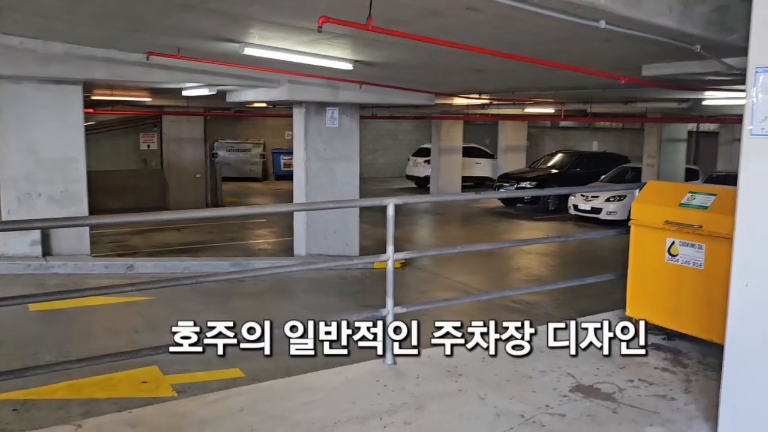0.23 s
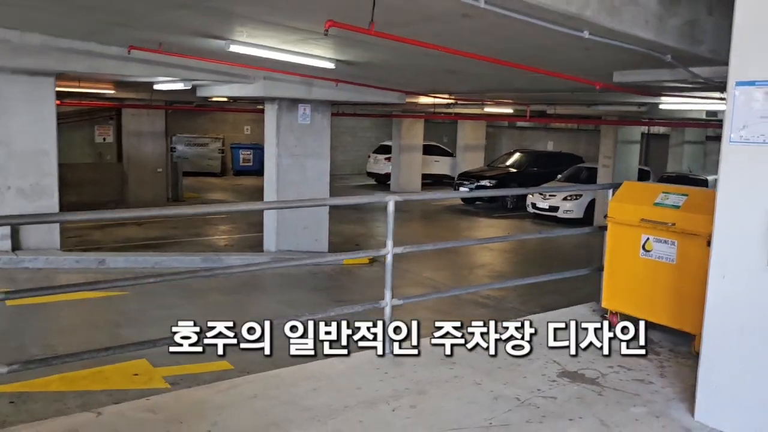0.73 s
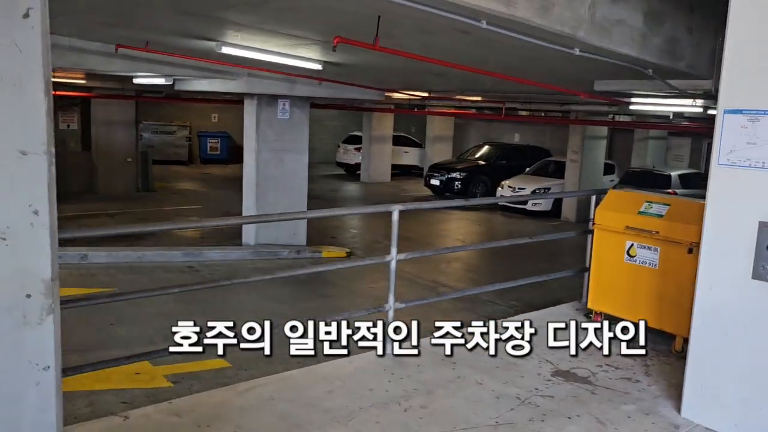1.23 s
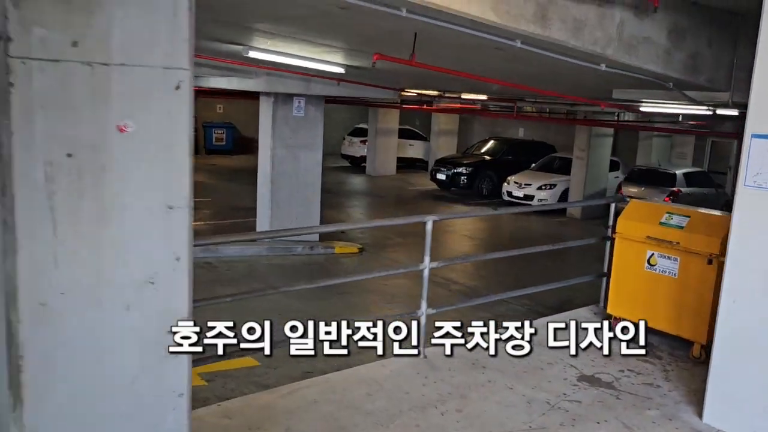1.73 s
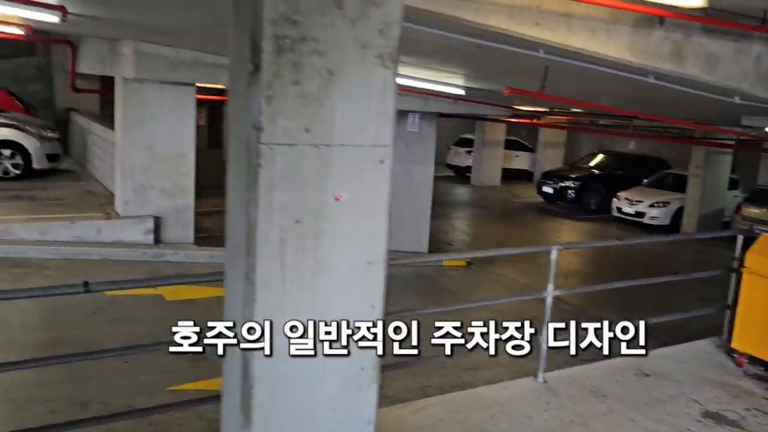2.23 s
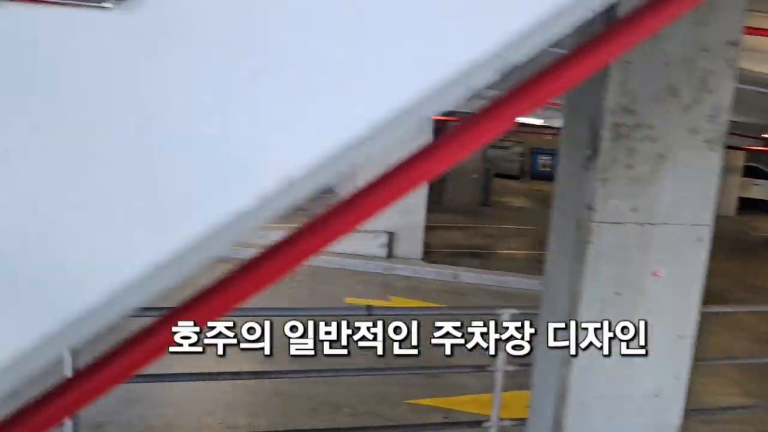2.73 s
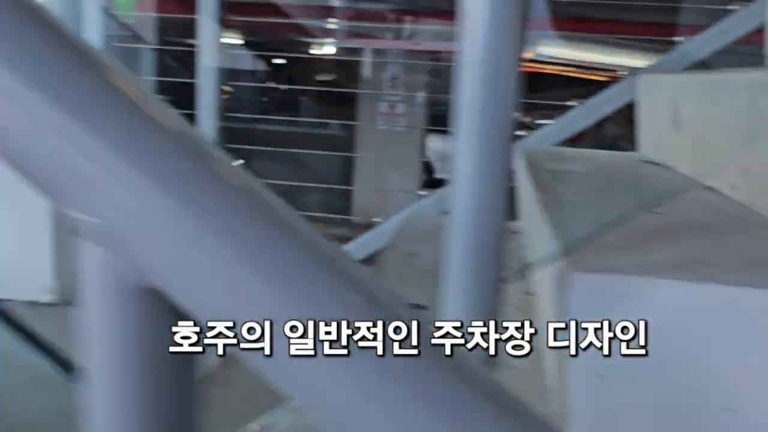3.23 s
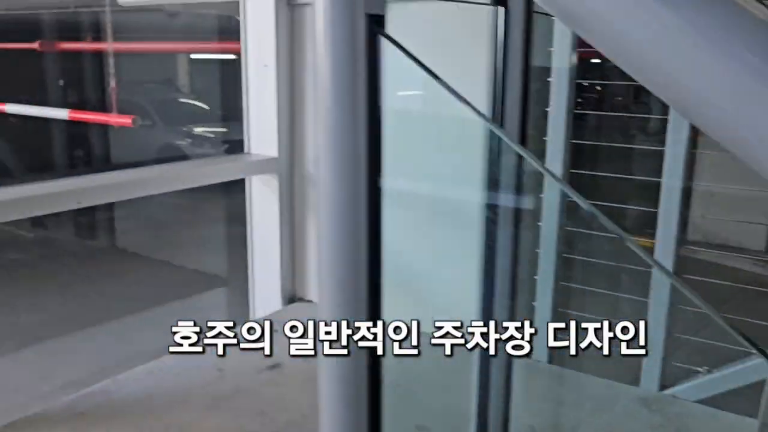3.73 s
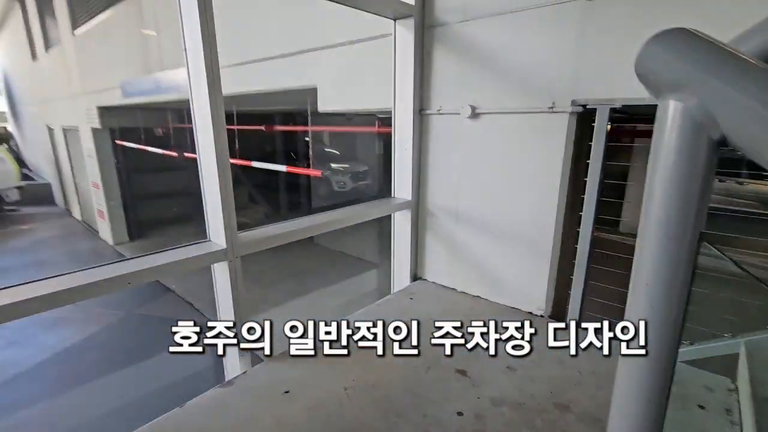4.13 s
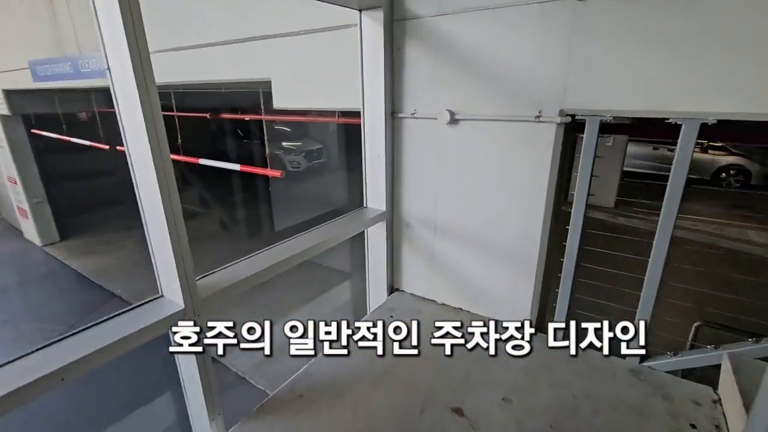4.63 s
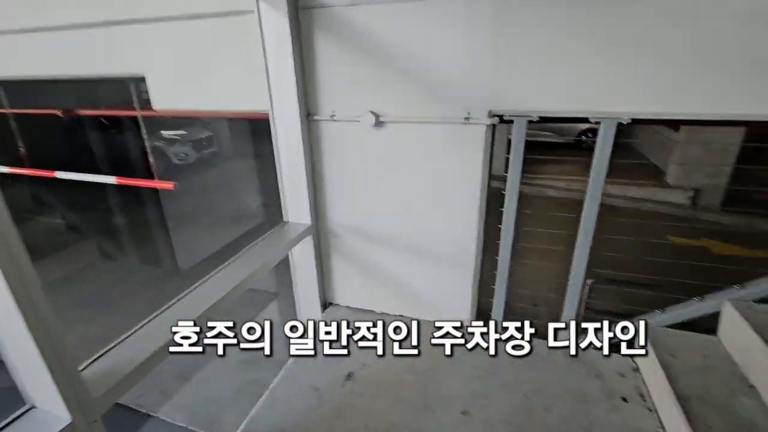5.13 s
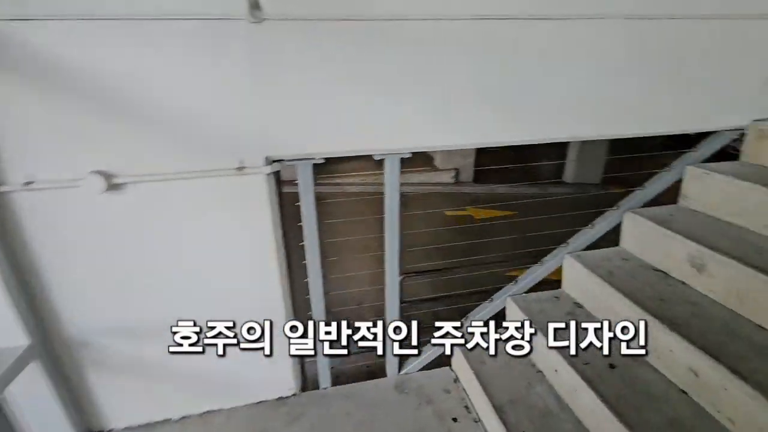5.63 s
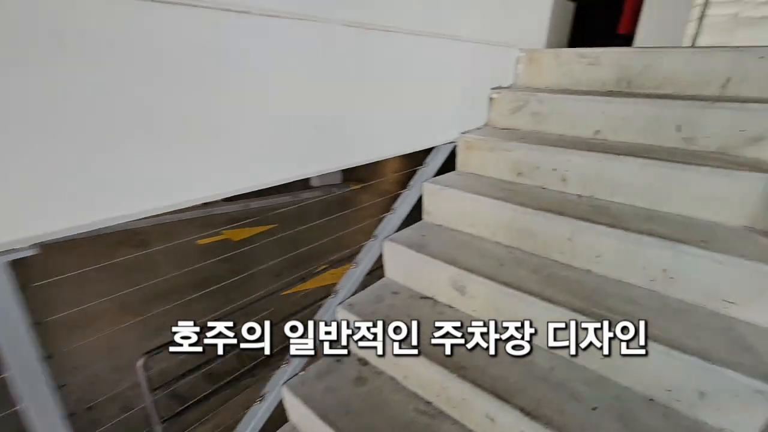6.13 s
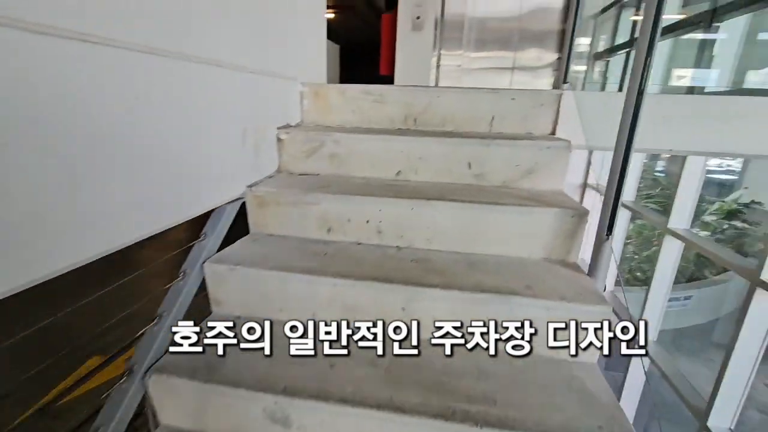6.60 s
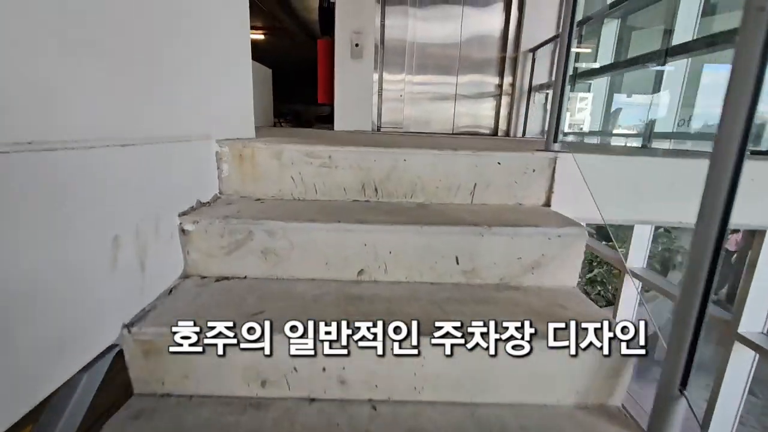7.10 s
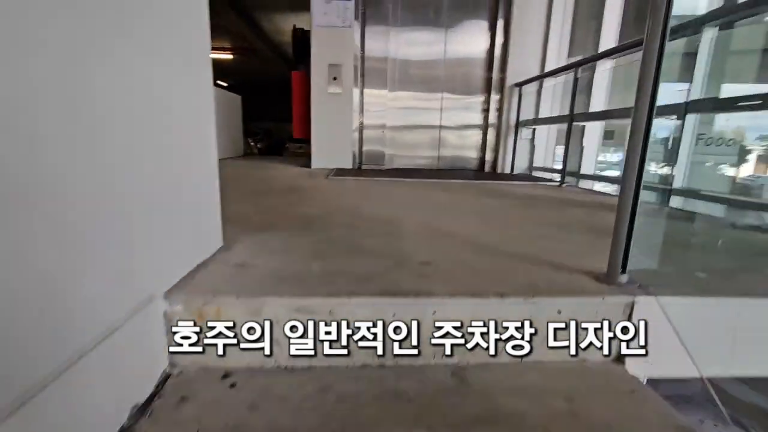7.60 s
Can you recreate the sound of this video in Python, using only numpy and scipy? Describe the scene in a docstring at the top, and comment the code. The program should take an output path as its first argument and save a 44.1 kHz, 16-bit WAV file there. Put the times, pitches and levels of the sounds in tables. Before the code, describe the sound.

One person walks evenly on gritty concrete, sharpest mid-way, with bassy wind thumps early, small dry snaps, cloth rustle and a soft fan hum.

```python
"""Footsteps in a windy car park

Someone walks through a concrete car park and up a stairwell, holding a phone.
Wind noise, slow pressure swings and pops strike the two microphone ports unequally; soles are struck
resonances and gritty slides, answered by a diffuse tail from bare walls. Clothing is crackling noise;
dry snaps, a brief squeak and a chirp are short resonant bursts; ventilation and far traffic are
coloured noise with a fan tone."""
import sys
import numpy as np
from scipy import signal
from scipy.fft import rfft, irfft, next_fast_len
from scipy.io import wavfile
from scipy.ndimage import map_coordinates

SR = 44100
rng = np.random.default_rng(int(sys.argv[2]) if len(sys.argv) > 2 else 0)


def pcm_store(signal):
    """Save signal as 16-bit PCM."""
    levels = np.round(np.clip(np.atleast_2d(signal), -1, 1) * 32767)
    wavfile.write(sys.argv[1], SR, levels.astype(np.int16).T)


N = 346626

# Wind on the ports between the thumps. Each row: time in seconds, level in dB.
WIND_LEVEL = [(0.17, -27.5), (0.35, -19), (0.43, -27), (0.6, -28), (0.88, -23), (1.1, -25.5), (1.5, -28.5),
              (1.7, -32.5), (2.15, -29.5), (2.6, -32.5), (2.75, -20.5), (3.0, -33), (3.35, -27.5),
              (3.5, -36), (4.12, -43), (4.98, -39), (5.3, -33), (5.62, -39), (6.1, -44), (6.54, -49),
              (7.16, -35), (7.43, -26), (7.86, -41.5)]
# Spectrum of the body of the wind. Each row: frequency in Hz, relative density in dB per Hz.
WIND_SPECTRUM = [(13, -53), (22, -15), (53, 4), (75, 4.5), (129, -2), (166, -10), (258, -22), (474, -28.5),
                 (522, -63), (600, -35.5), (780, -31), (1320, -120)]
# Spectrum of the sharp edge of eddies. Each row: frequency in Hz, relative density in dB per Hz.
EDGE_SPECTRUM = [(60, -47), (150, 1.5), (260, -2.5), (450, -22.5), (900, -34), (1500, -120)]
EDGE_DB = -15.5  # sharp edge of the wind, under its body

# Ventilation and traffic. Each row: time in seconds, relative level in dB, treble lift in dB.
AIR_LEVEL = [(0.17, -51, 12.5), (0.3, -51, 0), (0.55, -56.5, 8), (1.2, -56, 11), (1.8, -56, 13.5),
             (2.3, -54, 13), (2.85, -52, 9), (3.45, -51, 9.5), (3.95, -49.5, 8.5), (4.5, -50.5, 11.5),
             (5.05, -48.5, 7), (5.6, -50, 8), (6.05, -49, 6), (6.4, -45, 6), (6.73, -49, 10),
             (7.12, -51, 10), (7.45, -49.5, 6), (7.86, -49.5, 7.5)]
# Spectrum of that noise. Each row: frequency in Hz, relative density in dB per Hz.
AIR_SPECTRUM = [(24, -26), (40, 1), (109, -1), (151, -5), (275, -10), (344, -4), (476, -10), (846, -13),
                (1500, -21), (2360, -25), (3030, -30), (3990, -31), (4880, -35), (13900, -48.5),
                (15800, -48)]
# Likeness of its two sides. Each row: frequency in Hz, left-right correlation from 0 to 1.
AIR_LIKENESS = [(60, 0.23), (290, 0.93), (640, 0.75), (1400, 0), (15000, 0)]
# A fan's tone. Each row: time in seconds, relative level in dB.
FAN_LEVEL = [(3.4, -82), (3.55, -54.5), (5.1, -49), (5.6, -63), (5.92, -82), (6.1, -43.5), (7.26, -55),
             (7.86, -51.5)]
FAN_HZ = 345.6

# Steady rubbing of cloth while walking. Each row: time in seconds, relative level in dB.
SWISH_LEVEL = [(0.3, -80), (0.59, -69), (0.78, -73), (1.59, -68), (2.25, -78), (2.48, -70), (2.71, -70),
               (4.05, -72), (4.46, -80), (5.24, -60), (5.56, -65.5), (5.8, -59), (6.05, -69), (6.3, -57.5),
               (6.9, -61), (7.35, -59), (7.86, -61.5)]
# Spectrum of rubbed cloth. Each row: frequency in Hz, relative density in dB per Hz.
CLOTH_SPECTRUM = [(1500, -10), (4000, -6.5), (8000, -4), (11500, 0), (15800, -5)]

# Eddies that hit the ports full on. Each row: middle in seconds, relative level in dB, length scale in
# seconds, mean pitch in Hz, left minus right in dB.
THUMP_EVENTS = [(0.251, -15, 0.019, 90.0, 3), (0.349, -7, 0.028, 77.0, -36), (0.494, -10.5, 0.012, 85, 4),
                (0.554, -11, 0.018, 75.0, -1.5), (0.73, -18, 0.015, 81.0, 3.0),
                (0.79, -12.5, 0.037, 69.6, 1), (0.86, -12.5, 0.018, 68, -1),
                (0.889, -12.5, 0.01, 80.4, 8.0), (0.937, -15.5, 0.025, 82.6, 7),
                (1.178, -24, 0.052, 73.0, -9), (1.26, -18.0, 0.037, 69.5, -1),
                (1.329, -15, 0.017, 78.4, 0.0), (1.414, -13, 0.028, 53.0, 1),
                (1.486, -20.5, 0.03, 85.0, -9), (1.525, -26, 0.016, 74.0, -3),
                (1.594, -19, 0.015, 74.0, -19.0), (1.633, -17.0, 0.014, 84.0, 9),
                (1.817, -19.5, 0.021, 74.6, -9), (1.922, -12, 0.026, 88, -0.5),
                (2.348, -19, 0.037, 71.6, -4), (2.413, -17, 0.009, 80.0, -7),
                (2.455, -15.5, 0.0082, 73.5, 5), (2.725, -16, 0.054, 74.7, -4.0),
                (2.804, -22, 0.035, 74, -11), (3.147, -9.5, 0.03, 71.6, -2), (3.211, -14, 0.014, 83.0, 0),
                (3.308, -17.5, 0.03, 89.0, 3.5), (3.388, -15, 0.018, 78, -3.0),
                (3.652, -26.5, 0.041, 97, 1), (3.713, -22.5, 0.025, 89, -1), (5.243, -20, 0.022, 78, 1),
                (5.388, -31, 0.034, 73.0, 33.0), (5.574, -27.0, 0.059, 78, 5),
                (5.731, -31.5, 0.027, 65.4, -1.0), (5.867, -20.5, 0.025, 75.5, -2.0),
                (6.743, -25.5, 0.034, 84, -4), (6.95, -28, 0.017, 63.7, -10.0),
                (7.265, -27, 0.071, 78.0, 3), (7.322, -25, 0.013, 79, 7), (7.374, -37, 0.023, 84.0, 0.0),
                (7.416, -26.0, 0.013, 89.0, 3), (7.47, -30, 0.033, 79.0, -5),
                (7.569, -32, 0.016, 86.0, 28.0), (7.697, -18, 0.017, 90, -0.5),
                (7.818, -22, 0.02, 76, -1.0)]
# Relative scatter of pitch from port to port; rough edge in dB under the swing.
THUMP_SPREAD, THUMP_EDGE_DB = 0.095, -19

# Clothing rustles. Each row: start in seconds, relative level in dB, decay constant in seconds.
RUSTLE_EVENTS = [(0.19, -50.5, 0.11), (0.2557, -38, 0.018), (0.428, -51.5, 0.046), (0.9755, -51, 0.038),
                 (1.374, -39, 0.046), (1.492, -46.5, 0.032), (1.8193, -50, 0.028), (2, -52, 0.016),
                 (2.467, -40, 0.042), (2.5014, -51, 0.038), (2.5774, -49, 0.068), (2.951, -53, 0.1),
                 (3.151, -52, 0.033), (3.6227, -48.5, 0.052), (4.052, -47.5, 0.037), (4.4797, -50, 0.014),
                 (4.6226, -42.5, 0.059), (5.3014, -46.5, 0.015), (5.859, -46, 0.058), (6.0738, -51, 0.059),
                 (6.869, -45.5, 0.013), (7.088, -47.5, 0.032), (7.646, -46.5, 0.041), (7.799, -54, 0.051)]
RUSTLE_RISE, RUSTLE_PAN_DB = 0.11, -1  # rise over fall; left minus right

# Sole contacts. Each row: start in seconds, overall level in dB, sole ring in Hz, thud in dB, clack in dB,
# rise constant in seconds, slap's 20 dB fall in seconds, relative scuff level in dB, scuff length in
# seconds, scuff brightness in dB per octave, room in dB.
STEP_EVENTS = [(0.2, -47, 905, -1, 6.5, 0.0079, 0.023, 5, 0.15, -7, -4.5),
               (0.757, -30.5, 800, -14, -21, 0.0039, 0.022, -2.5, 0.045, -11, -7.5),
               (1.323, -31, 800, -1, -8, 0.0017, 0.015, -24, .04, -2, -11),
               (1.338, -26.5, 790, -16, 0.5, 0.0028, 0.017, -6.5, 0.034, -6.5, -6.5),
               (1.876, -31.5, 740, 2, -4, 0.0015, 0.054, -5.5, 0.045, -4, -5),
               (2.431, -22.5, 740, -7, -3, 0.016, 0.018, -2.5, 0.024, -4, -7),
               (3.013, -29.5, 1000, 0, -4, 0.002, 0.021, -3, 0.025, -3, -2),
               (3.555, -13, 1300, -7, 3, 0.00085, 0.0078, -16.5, 0.044, -5, -8),
               (4.089, -10, 1100, -9.5, -8, 0.0002, 0.021, -14, 0.049, -5, -9.5),
               (4.58, -14, 1105, 1, -4.5, 0.0009, 0.0085, -8.5, 0.028, -6, -5.5),
               (5.113, -27.5, 895, 0, -7, 0.0018, .012, -2, 0.023, -1, -3.5),
               (5.1214, -21, 1080, 2, 0.5, 0.00055, 0.023, -4.5, 0.026, -8.5, -4),
               (5.641, -25, 1570, -0.5, -5, 0.00031, 0.024, 1, 0.059, -1, -6.5),
               (6.177, -27.5, 1190, -3.5, -3, 0.0032, 0.02, 6.5, 0.071, 1, -3.5),
               (6.759, -37.5, 680, -3, -3.5, 0.0027, 0.057, -2, 0.047, 0.5, -5),
               (7.36, -28.5, 800, -18, -12, 0.002, 0.012, -11, 0.039, -8, -9.5),
               (7.378, -24.5, 785, 0.5, -6, 0.0027, 0.029, -9.5, 0.054, -5.5, -10)]
STEP_PAN_DB = -0.9  # left minus right
# A sole sliding on grit. Each row: frequency in Hz, relative density in dB per Hz before brightness.
GRIT_SPECTRUM = [(300, -13), (900, 6), (2300, 16.5), (3300, 19), (3900, 17.5), (4800, 20), (5900, 11.5),
                 (7000, 15), (11500, 11), (15800, 9)]
# Rubber on smooth concrete. Each row: frequency in Hz, width in Hz, relative level in dB.
SQUEAK_MODES = [(3900, 110, 0), (4400, 190, -10), (5890, 260, 3.5)]
# Decay of the diffuse tail. Each row: frequency in Hz, time to fall 60 dB in seconds.
HALL_DECAY = [(300, 0.63), (800, 0.83), (2100, 0.71), (5500, 0.66), (14000, 0.41)]
PORT_LAG = 4  # samples by which the right port hears the direct sound later

# Low pops on the ports: sharp eddies, and at 4.15 s the low push of a snap. Each row: start in seconds,
# relative level in dB, left minus right in dB, pitch in Hz.
POP_EVENTS = [(0.225, -18, 24, 170), (0.286, -18, 7, 201), (0.345, -27, -23, 255), (0.486, -17, 14, 258),
              (0.502, -16, 21.5, 196), (0.534, -10.5, 3, 170), (0.838, -21, -5, 170), (0.926, -24, -2, 170),
              (0.961, -16, -12, 170), (1.014, -17, 15, 211), (2.261, -22.5, -14, 182),
              (2.743, -25, 4.5, 285), (2.765, -22, -6, 170), (3.294, -17, 10, 186), (4.15, -24, -1, 300)]
# Each footfall shakes the phone through the hand: relative level, pitch.
JOLT_DB, JOLT_HZ = -37.5, 170

# Dry snaps close to the phone, with a brief squeak at 6.183 s and a chirp at 7.049 s. Each row: start in
# seconds, level in dB, crack in Hz, crack width in Hz, body in dB against the crack, left minus right in dB.
SNAP_EVENTS = [(1.739, -46, 8000, 6000, -30, -18), (2.673, -38, 8000, 6000, -30, -5),
               (2.822, -25, 8400, 6000, -25, 0), (4.152, -20.5, 6000, 14000, 11, 8.5),
               (4.24, -48.5, 7000, 8000, 10, -24), (4.35, -33, 4960, 12000, 12.5, 6.5),
               (4.555, -35, 4960, 1500, -20, -1), (5.642, -45, 4970, 7000, -7, 0),
               (6.183, -24, 3900, 350, -15, 5), (7.049, -41, 3220, 250, -30, 2),
               (7.068, -38, 5200, 700, -25, 2)]
SNAP_BODY_HZ = 815

# The ports ring faintly. The single row: frequency in Hz, width in Hz, level in dB.
PORT_RESONANCE = (2210, 490, -10.5)
START_S, TOP_HZ = 0.166, 15900  # end of the opening silence; band limit


def amp(db):
    """A level difference in dB is a ratio of amplitudes."""
    return 10 ** (np.asarray(db) / 20)


def unit(x):
    """Equal mean power: each channel is brought to rms 1."""
    return x / np.sqrt(np.mean(x ** 2, -1, keepdims=True) + 1e-20)


def peak(x):
    """Equal extremes: the largest magnitude is brought to 1."""
    return x / np.abs(x).max()


def along(points, hz):
    """Interpolation of (Hz, value) points on a logarithmic frequency axis."""
    f, v = np.transpose(points)
    return np.interp(np.log(hz + 1), np.log(f + 1), v)


def curves(rows):
    """Linear interpolation in time: one value per sample for each column after the first."""
    s, *cols = np.transpose(rows)
    return [np.interp(np.arange(N) / SR, s, c) for c in cols]


def wobble(rate):
    """Slow random modulation: a smooth curve for each channel through rate random knots a second."""
    knots = rng.standard_normal((2, N // 200))
    return np.array([map_coordinates(k, [np.arange(N) * rate / SR]) for k in knots])


def filtered(x, response):
    """Linear filtering: the spectrum is multiplied by a response of frequency."""
    n = x.shape[-1]
    m = next_fast_len(n + 8192)
    return irfft(rfft(x, m) * response(np.fft.rfftfreq(m, 1 / SR)), m)[..., :n]


def noise(spectrum, size):
    """Coloured noise: two unrelated channels shaped by a (Hz, dB) spectrum."""
    white = rng.standard_normal((2, size))
    return unit(filtered(white, lambda hz: amp(along(spectrum, hz))))


def band(f, hz, width):
    """Response of a damped resonator, causal and with unit gain at its centre."""
    return 1j * f * width / (hz * hz - f * f + 1j * f * width)


def jumps(size, hold, depth_db):
    """Stick and slip: a random gain that jumps every hold samples."""
    return amp(depth_db * rng.standard_normal(size // hold + 1).repeat(hold)[:size])


def crackle(size, depth_db):
    """Granular friction: the gain jumps every millisecond or so, as grains catch."""
    return jumps(size, 50, depth_db)


def sides(pan_db):
    """Level difference between the channels: left and right gains."""
    return amp(np.array([[.5], [-.5]]) * pan_db)


def walls(x, wet_db, feed=None):
    """Diffuse reverberation: x plus a random tail in which each frequency decays at its own speed."""
    hz, t, z = signal.stft(rng.standard_normal((2, 40000)), SR, nperseg=256)
    decay = amp(-60 * t / along(HALL_DECAY, hz)[:, None])
    tail = signal.istft(z * decay, SR, nperseg=256)[1]
    tail *= 1 - np.exp(-np.arange(tail.shape[1]) / SR / 0.0054)  # reflections build up
    tail /= np.linalg.norm(tail[0])
    wet = signal.fftconvolve(x if feed is None else feed, tail, axes=1)
    # the right port is further from the floor
    direct = np.array([x[0], np.pad(x[1], (PORT_LAG, 0))[:x.shape[1]]])
    return np.pad(direct, [(0, 0), (0, wet.shape[1] - x.shape[1])]) + amp(wet_db) * wet


def add(track, s, x):
    """Superposition: x is summed into the track from s seconds."""
    part = track[:, round(s * SR):][:, :x.shape[1]]
    part += x[:, :part.shape[1]]


def wind():
    """Turbulence: eddies hit each port on its own, and the strongest lumps reach higher in pitch."""
    level_db, = curves(WIND_LEVEL)
    lump = wobble(22)
    body = unit(amp(5.1 * lump) * noise(WIND_SPECTRUM, N))
    edge = unit(amp(8.8 * lump) * noise(EDGE_SPECTRUM, N))
    return amp(level_db) * (body + amp(EDGE_DB) * edge)


def fan():
    """A periodic source: one sine whose pitch and level waver."""
    hum_db, = curves(FAN_LEVEL)
    gain = amp(hum_db - 3.0 + 0.37 * wobble(7.5)[0])
    return gain * np.sin(2 * np.pi * np.cumsum(FAN_HZ + 3 * wobble(13)[0]) / SR)


def air():
    """Partial coherence: steady hall noise most alike on both sides in the low mids, with a fan tone."""
    level_db, lift_db = curves(AIR_LEVEL)
    a, b = noise(AIR_SPECTRUM, N)

    def angle(hz):
        """Correlation is the cosine of twice this mixing angle."""
        return np.arccos(np.clip(along(AIR_LIKENESS, hz), -1, 1)) / 2

    mid = filtered(a, lambda hz: np.cos(angle(hz)))
    side = filtered(b, lambda hz: np.sin(angle(hz)))
    pair = np.array([mid + side, mid - side])
    treble = filtered(pair, lambda hz: hz ** 2 / (hz ** 2 + 3000 ** 2))
    pair = pair + (amp(lift_db + 0.17 * wobble(12)[0]) - 1) * treble
    hum = fan()
    return amp(level_db + 6 + 2.02 * wobble(3.212)[0]) * pair + hum


def swish():
    """Continuous friction: a thin bright rubbing that comes and goes, differently on each side."""
    level_db, = curves(SWISH_LEVEL)
    gain = amp(level_db + 4.7 * wobble(16))
    return gain * unit(crackle(N, 2.5) * noise(CLOTH_SPECTRUM, N))


def thumps():
    """Eddy pressure: a few cycles of low swing with a rough edge, out of step on the two ports."""
    out, t = np.zeros((2, N)), np.arange(-SR // 10, SR // 10) / SR
    draws = rng.standard_normal((len(THUMP_EVENTS), 2, 2, 1))
    for (s, db, length_s, hz, pan_db), (pitch, phase) in zip(THUMP_EVENTS, draws):
        # the ports share one total power
        share = np.sqrt(2) * sides(pan_db) / np.linalg.norm(sides(pan_db))
        swing = np.sin(2 * np.pi * hz * (1 + THUMP_SPREAD * pitch) * t + 1.6 * phase)
        swing = swing + amp(THUMP_EDGE_DB) * noise(EDGE_SPECTRUM, len(t))
        swell = np.exp(-3 * (t / length_s) ** 2)
        add(out, s + t[0], amp(db) * share * swell * swing)
    return out


def rustles():
    """Brief friction: cloth close to the phone gives short bright puffs of fine crackle, dry."""
    out, t = np.zeros((2, N)), np.arange(SR // 3) / SR
    for s, db, fall_s in RUSTLE_EVENTS:
        shape = (1 - np.exp(-t / (RUSTLE_RISE * fall_s))) * np.exp(-t / fall_s)
        cloth = unit(crackle(len(t), 1.2) * noise(CLOTH_SPECTRUM, len(t)))
        add(out, s, amp(db) * sides(RUSTLE_PAN_DB) * shape * cloth)
    return out


def slap(t, modes, rise_s, slap_s):
    """Impact excites resonance: a noise burst rings each mode; also gives what the room hears."""
    a, b = rng.standard_normal((2, len(t))) * (1 - np.exp(-t / rise_s)) * amp(-20 * t / slap_s)
    burst = np.array([a + 0.39 * b, a - 0.35 * b])  # the ports face different walls
    hit, spread = 0, 0
    for centre, width, level in modes:
        colour = lambda f: band(f, centre, width) ** 3
        part = amp(level) * peak(filtered(burst, colour))
        hit = hit + part
        # the room hears the slap from all directions: same energy, smooth spectrum
        spread = spread + unit(filtered(t == 0, colour)) * np.std(part, 1, keepdims=True)
    return hit, spread


def scuff(t, rise_s, scuff_db, scuff_s, bright_db):
    """Stick-slip friction: a sole slides on grit, with squeak resonances fed by the same noise."""
    slide = (1 - np.exp(-t / (rise_s + 0.00081))) / (1 + (t / scuff_s) ** 4)
    slide = slide * jumps(len(t), 400, 2.6)  # the sole catches and lets go
    tilted = [(f, level + bright_db * np.log2(f / 3000)) for f, level in GRIT_SPECTRUM]
    grit = noise(tilted, len(t))
    squeak = filtered(grit, lambda f: sum(amp(level) * band(f, c, w) for c, w, level in SQUEAK_MODES))
    friction = unit(crackle(len(t), 3.8) * grit + amp(8.0 + 2 * bright_db) * squeak)
    return amp(scuff_db - 10.5) * slide * friction


def steps():
    """Impact, friction and reverberation: each sole slaps and slides, and the stairwell answers."""
    out, t = np.zeros((2, N)), np.arange(SR // 5) / SR
    for (s, db, hz, thud_db, clack_db, rise_s, slap_s,
         scuff_db, scuff_s, bright_db, room_db) in STEP_EVENTS:
        # sole ring, thud, clack: centre Hz, width Hz, dB
        modes = [(hz, 1.026 * hz, 0), (480, 550, thud_db), (2100, 1500, clack_db)]
        hit, spread = slap(t, modes, rise_s, slap_s)
        slide = scuff(t, rise_s, scuff_db, scuff_s, bright_db)
        add(out, s, amp(db) * sides(STEP_PAN_DB) * walls(hit + slide, room_db, spread + slide))
    return out


def pops():
    """A pressure pulse: one push and rebound of air; every footfall gives a weak one too."""
    out, t = np.zeros((2, N)), np.arange(SR // 20) / SR
    jolts = [(step[0], JOLT_DB, 0, JOLT_HZ) for step in STEP_EVENTS]
    for s, db, pan_db, hz in list(POP_EVENTS) + jolts:
        u = t * hz - 1  # cycles from the middle of the pulse
        pulse = (1 - 14 * u * u) * np.exp(-7 * u * u)
        sign = rng.choice([-1, 1], (2, 1))
        add(out, s, amp(db - 5.5) * sides(pan_db) * sign * pulse)
    return out


def snaps():
    """Impulsive excitation: a burst of milliseconds rings a wide band as a snap, a narrow one as a chirp."""
    out, t = np.zeros((2, N)), np.arange(SR // 20) / SR
    for s, db, crack_hz, width_hz, body_db, pan_db in SNAP_EVENTS:
        burst = rng.standard_normal((2, len(t))) * amp(-20 * t / 0.0021)
        body = peak(filtered(burst.mean(0), lambda f: band(f, SNAP_BODY_HZ, 0.4 * SNAP_BODY_HZ)))
        crack = peak(filtered(burst, lambda f: band(f, crack_hz, width_hz) ** 2))
        # little room
        add(out, s, amp(db) * walls((crack + amp(body_db) * body) * sides(pan_db), wet_db=-18))
    return out


def scene():
    """Superposition of all sources at the two ports."""
    return wind() + thumps() + pops() + air() + steps() + snaps() + rustles() + swish()


def record(dry):
    """Port resonance and band limit: sound cuts in after a short silence and the ports ring faintly."""
    opening = np.clip((np.arange(N) / SR - START_S) / 0.0033, 0, 1)
    hz, width, db = PORT_RESONANCE
    return filtered(dry * opening, lambda f: (1 + amp(db) * band(f, hz, width)) * (f < TOP_HZ))


dry = scene()
out = record(dry)
pcm_store(out)
```